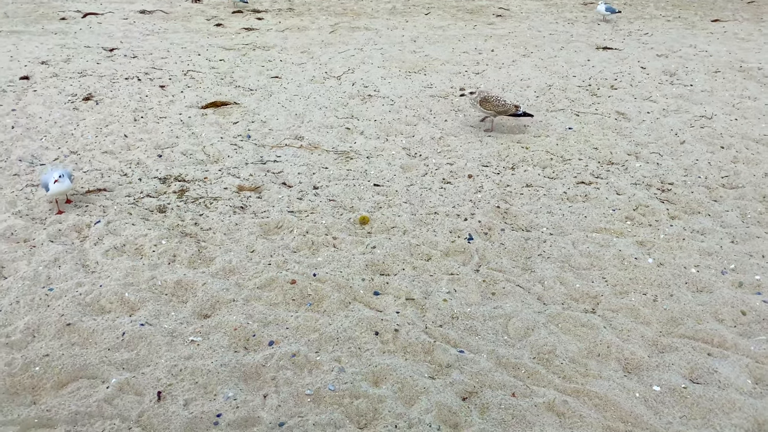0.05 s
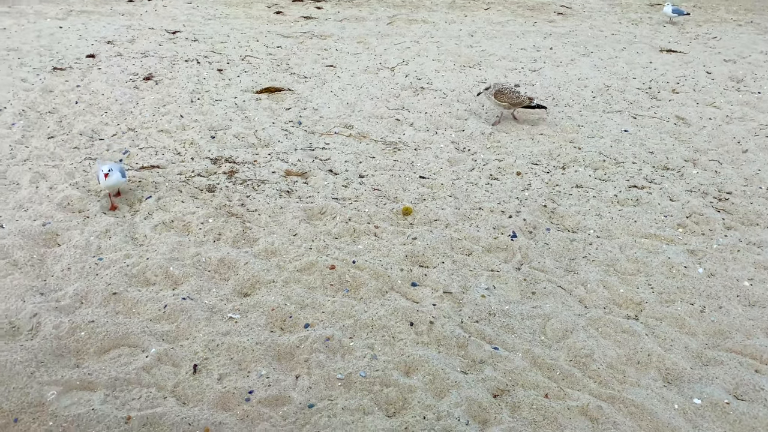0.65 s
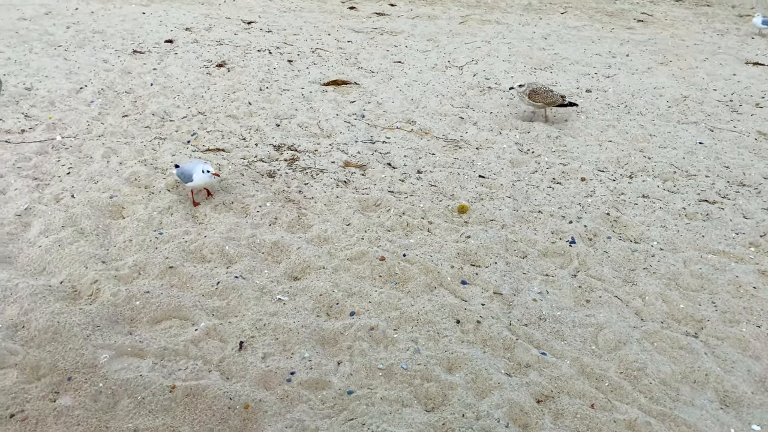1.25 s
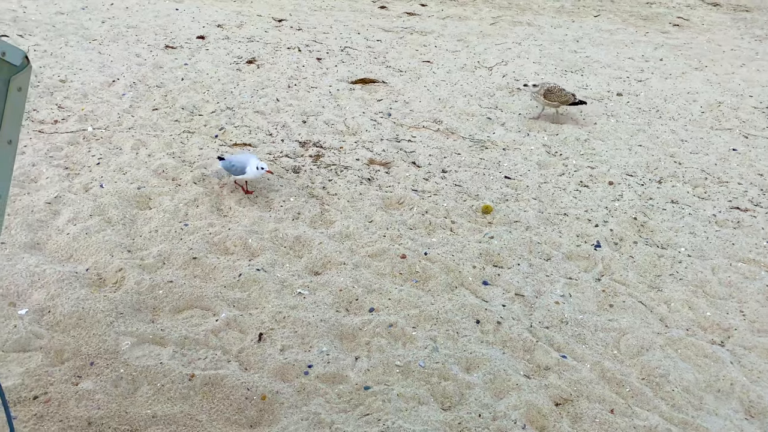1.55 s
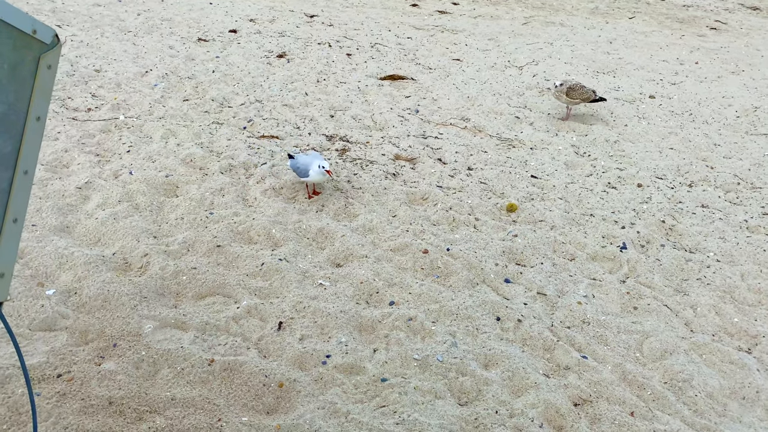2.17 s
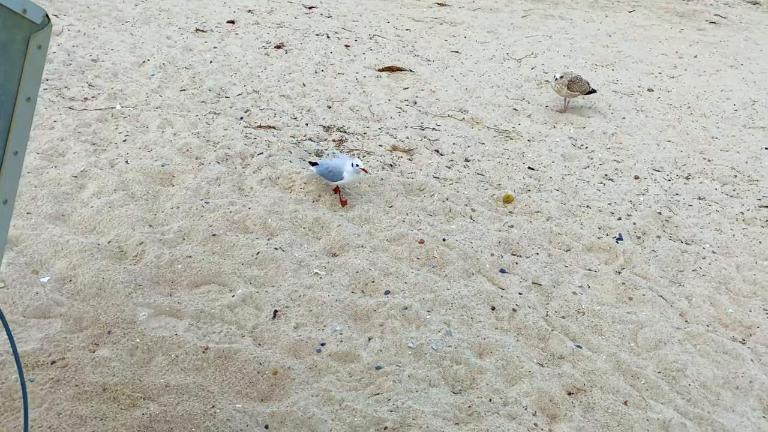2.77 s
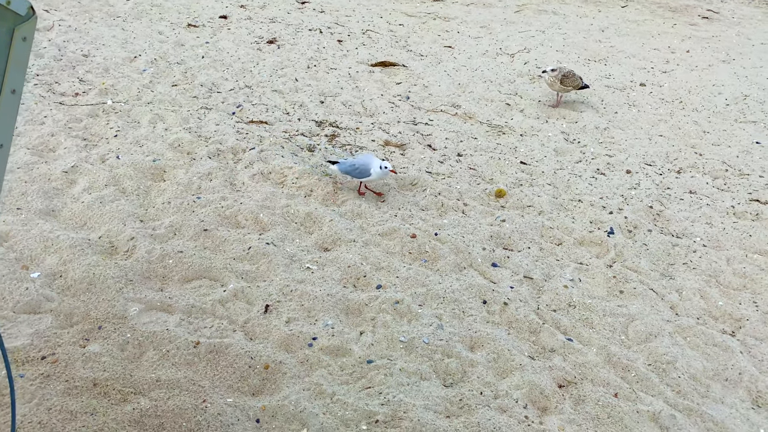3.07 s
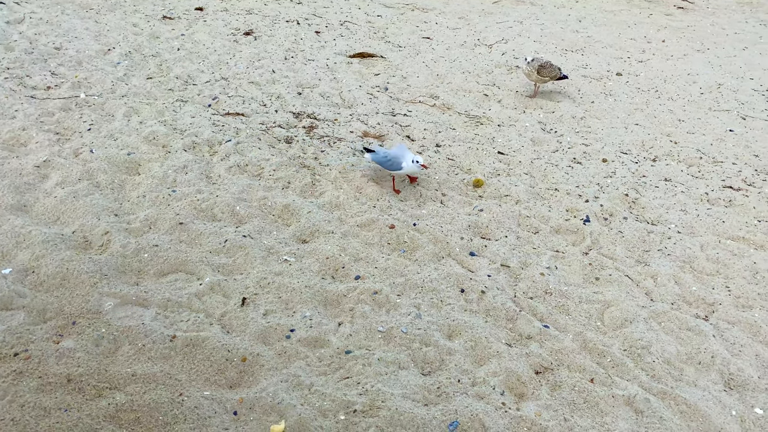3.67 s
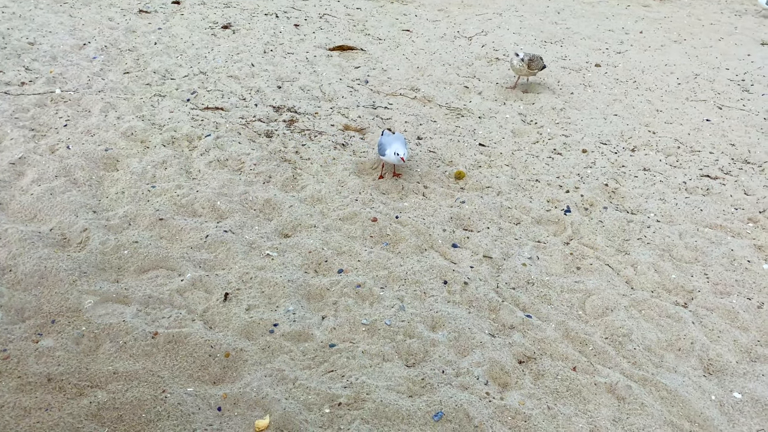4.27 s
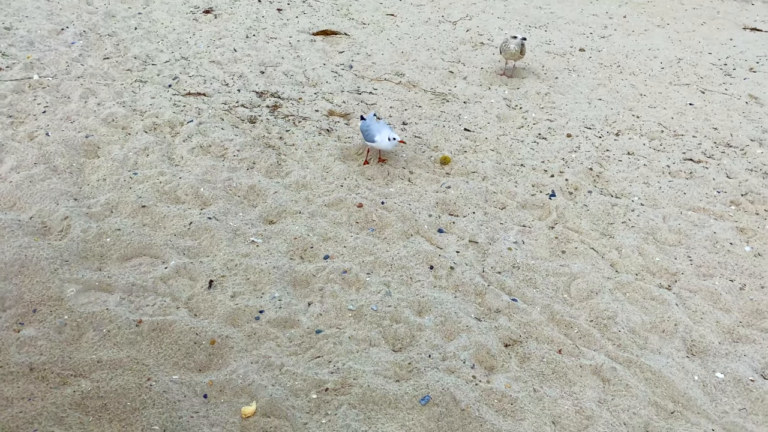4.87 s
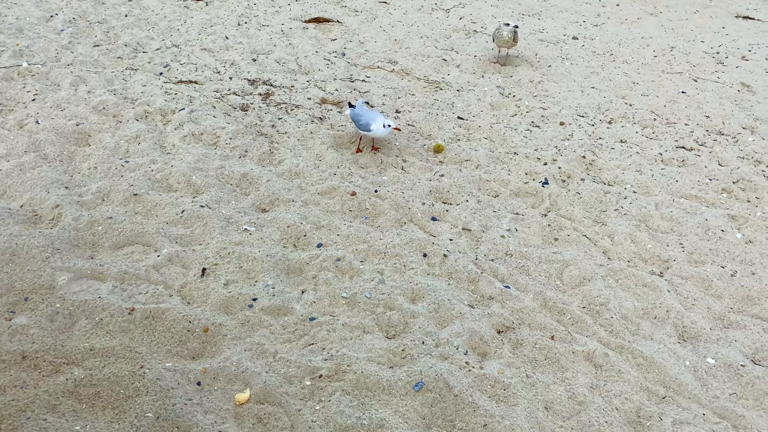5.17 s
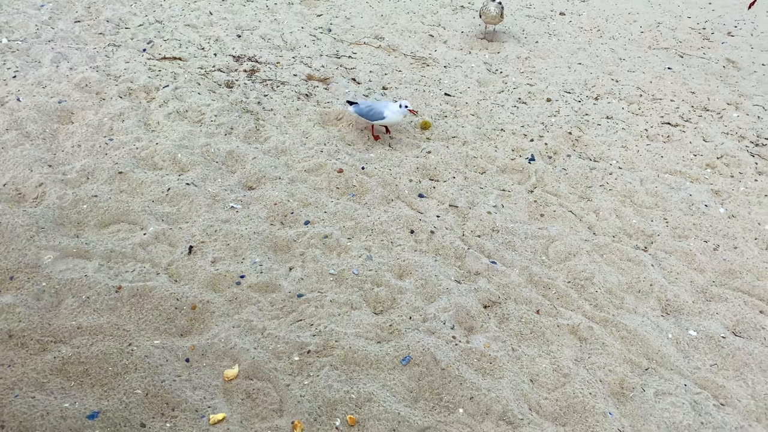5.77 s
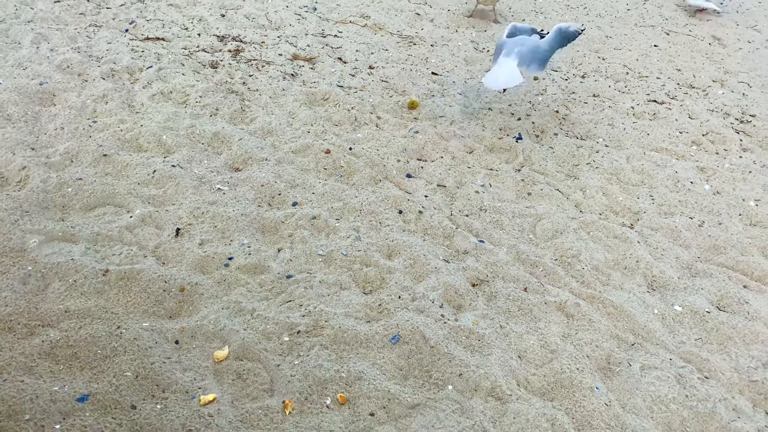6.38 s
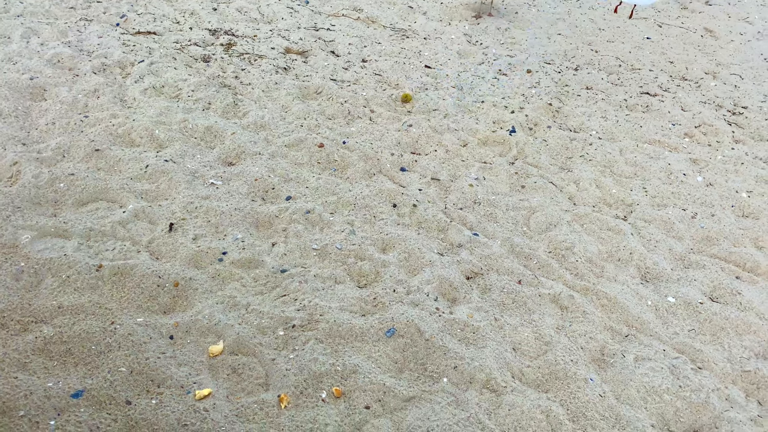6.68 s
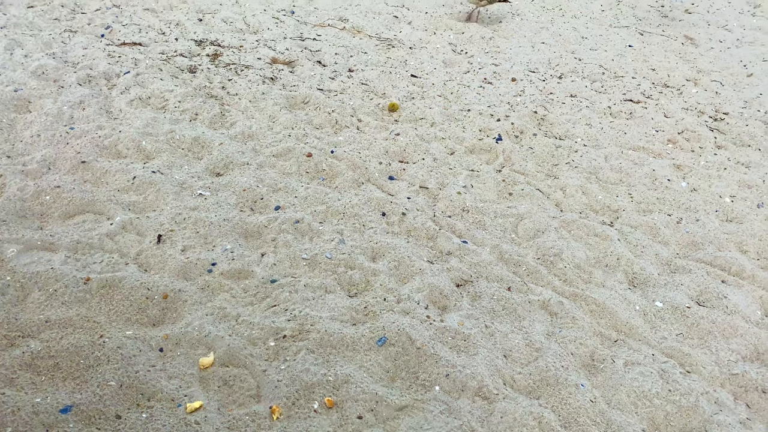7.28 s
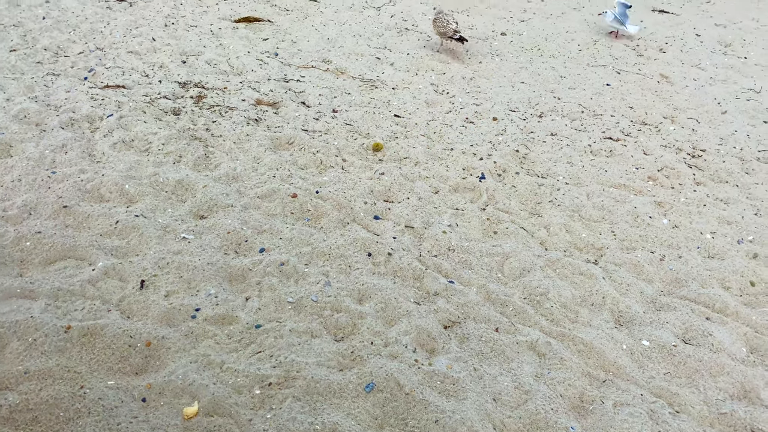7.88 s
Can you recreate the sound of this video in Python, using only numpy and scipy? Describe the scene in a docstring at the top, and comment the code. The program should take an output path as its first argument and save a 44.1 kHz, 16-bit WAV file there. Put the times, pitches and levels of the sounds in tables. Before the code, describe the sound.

On an open beach, gulls give six harsh, reedy calls a few metres from a hand-held microphone, five from the left and the last from the right. A young gull adds three thin, high begging whistles from the left, each overlapping a call. Wind rumbles and thumps on the microphone, growing stronger in the second half, over a soft wash of distant surf.

```python
"""Gulls on a sandy beach

A few metres from a hand-held phone, adult gulls give six harsh calls: a reedy tone from the
syrinx (a bird's voice box) whose pitch and strength collapse some fifty times a second.
A young gull begs in three thin whistles that jump between registers (pitch ranges).
Wind buffets the two microphone openings over a soft wash of surf."""
import sys
import numpy as np
from scipy import signal
from scipy.fft import rfft, irfft, next_fast_len
from scipy.io import wavfile
from scipy.ndimage import uniform_filter1d, map_coordinates

SR = 44100
rng = np.random.default_rng(int(sys.argv[2]) if len(sys.argv) > 2 else 0)


def log_audio(samples):
    """Write samples as a 16-bit WAV file to the path given in sys.argv[1]."""
    # one column per channel
    frames = np.atleast_2d(samples).T
    # limit to full scale, then quantise
    limited = np.clip(frames, -1, 1)
    pcm = np.round(limited * 32767).astype(np.int16)
    wavfile.write(sys.argv[1], SR, pcm)


N = 354343
TIME = np.arange(N) / SR
TOP_HZ = 15800  # the phone cuts off higher sound

# how six throat shapes colour a gull's voice: (frequency [Hz], gain [dB])
SHRILL = [(450, -13), (800, -5), (1100, -12.5), (1400, -3), (1650, -3), (1830, 6), (2020, -9), (2230, 15),
          (2480, 12.5), (2900, 11), (3200, 1), (3700, -10.5), (4270, -4.5), (4600, -11.5), (4960, -2.5),
          (5400, -12), (5720, -10.5), (6300, -18), (7300, -8), (8400, -26.5), (10200, -14.5), (11300, -17),
          (13300, -29), (15500, -15)]
FULL = [(400, 1), (700, 9), (1180, 15.5), (1450, 12), (1900, -3.5), (2300, -2), (2650, -3), (3000, 1),
        (3400, -16), (3700, -19), (4000, -4.5), (4300, -1.5), (4680, 2), (5250, -17), (5750, -10.5),
        (6100, -11), (6650, 3), (7200, -19.5), (7900, -23.5), (9300, -21), (10400, -14), (12000, -31),
        (13200, -35), (15500, -26)]
CROAK = [(400, -27), (650, 3.5), (930, -6), (1350, 1), (1870, 1), (2400, -10), (2850, -2), (3250, 6),
         (3700, -12.5), (4000, -11), (4650, -3.5), (5200, -8), (5700, -13), (6100, -15), (6550, -14.5),
         (7900, -26), (9800, -18.5), (13200, -28), (15500, -45)]
HOARSE = [(450, 1.5), (850, 9), (1280, 10.5), (1480, 5.5), (1750, -7.5), (2020, 1.5), (2550, -10.5),
          (3100, 4), (3800, -15), (4400, -9), (4920, 3), (5350, -15), (5680, -9), (6300, -13.5),
          (8300, -27), (9700, -20), (11000, -22), (13300, -25), (15500, -16)]
WIDE = [(400, -6), (700, -5.5), (1150, -4), (1400, 3), (1700, 14.5), (2150, 6), (2500, -3), (2950, 9.5),
        (3450, -3.5), (4050, -14), (4750, -4.5), (5350, -24), (5750, -11), (6150, -22), (6580, -4.5),
        (7100, -24), (7800, -29), (9450, -12.5), (10400, -21), (11100, -18), (13000, -38), (15500, -26)]
HOLLOW = [(500, -27), (800, -0.5), (1100, 1), (1600, 2), (2300, 12), (3300, -2.5), (4800, -38), (5900, -32),
          (8500, -43), (13000, -39), (15500, -82)]
# how sound from each side reaches the microphones: (frequency [Hz], left minus right [dB], left lead [rad])
FROM_LEFT = [(665, -2.5, 0.17), (1070, 4, 1.22), (1260, -0.5, 0.21), (1590, 12, 1.49), (3020, -2.5, 1.59),
             (3600, -0.5, 1.56), (3750, -8.5, 0.6), (4380, 11.5, 1.5), (5800, -1, 1.58), (6400, 10.5, 1.7),
             (9100, -5.5, 2.42), (9900, -1, 0.39), (11400, -0.5, 1.06), (15600, 1, 2.8)]
FROM_RIGHT = [(790, -4.5, -2), (1060, -7, 2.1), (1840, 4.5, -3), (2550, 4, -0.9), (3430, 0, -2),
              (12000, 0, -1.2)]


def adult_gulls(gain_db=0.92):
    """Five harsh calls come from the left and a last one from the right."""
    # the calls: (start [s], end [s], fade-in [s], rise [s], upward scoop [share of pitch],
    # top pitch [Hz], late pitch [Hz], bend of the fall [1 = straight], crack after [s],
    # step down at the crack [share], roughness [0-1], early throbs [per s], throb depth [0-1],
    # chest tone [dB], its change [dB], its change time [s], raggedness [dB], beak ring [dB],
    # its change [dB], rasp [dB], its change [dB], beak closing [s], throat, direction)
    calls = [ (0.421, 0.822, 0.016, 0.021, -0.042, 1145, 933, 1.58, 0.46, 0.034, 1.0, 51, 0.31, -44.5, 6.5, 0.35, 1.7, -28.5, -4, -34.5, -6, 0.24, SHRILL, FROM_LEFT),
             (1.693, 2.766, 0.06, 0.048, 0.41, 1197, 717, 1.495, 0.48, 0.089, 0.85, 58.13, 0.51, -24.5, -19, 0.97, 1, -29, -8.5, -31.5, -8.5, 0.17, FULL, FROM_LEFT),
             (3.294, 3.891, 0.038, .12, 0.23, 921, 919, 3.7, 0.54, 0.12, 0.6, 50.18, 0.57, -35, -4.5, 1, 0.51, -38, 2, -53, 1, 0.12, CROAK, FROM_LEFT),
             (4.311, 4.686, 0.015, 0.042, 0.28, 1123, 959, 1.55, 0.28, 0.026, 1.0, 54.34, 0.36, -36.5, -15, 1, 2.8, -33, 2, -38, -6, 0.24, HOARSE, FROM_LEFT),
             (5.207, 5.916, 0.049, .06, .27, 1205, 722, 2.1, .5, 0.035, 0.9, 57.56, 0.53, -25, -16, 1, 1.4, -39, 7.5, -41, -3.5, 0.16, WIDE, FROM_LEFT),
             (6.817, 7.842, 0.028, 0.055, 0.25, 1153, 990, 0.64, 0.745, 0.16, 1.0, 53.53, 0.68, -26.5, -16, 0.58, 4.3, -48.5, -13, -76, 11.5, 0.022, HOLLOW, FROM_RIGHT),
             ]
    out = np.zeros((2, N))
    for start, end, *call, direction in calls:
        t = span(start, end)
        add(out, t, undb(gain_db) * harsh_call(t, *call), direction)
    return out


def harsh_call(t, attack_s, rise_s, scoop, top_hz, late_hz, bend, crack_s, step, harsh, early_rate,
               depth, chest_db, chest_change_db, chest_change_s, ragged_db, ring_db, ring_change_db,
               rasp_db, rasp_change_db, closing_s, throat):
    """A call scoops up, glides down, cracks into a clearer voice and drops; its throbs slow as it tires."""
    crack_length_s, end_drop, end_drop_s, release_s = 0.06, 0.27, .065, 0.028
    late_rate, tiring_s = 46.5, .25  # throbs slow to this many a second just before the crack
    shut_ring_db, shut_rasp_db = -21, -22.5  # what a shut beak takes off
    age, remaining = t - t[0], t[-1] - t
    progress = age / age[-1]
    still_to_rise = 1 - ramp(age, rise_s)
    cracked = ramp(age - crack_s + crack_length_s / 2, crack_length_s)
    fall = top_hz + (late_hz - top_hz) * progress ** bend
    pitch = fall * (1 - step * cracked) * (1 - end_drop * (1 - ramp(remaining, end_drop_s)))
    throb_rate = late_rate + (early_rate - late_rate) * ramp(crack_s - age, tiring_s)
    overshoot = .6 * scoop ** 2 * np.exp(-(2 * (age / rise_s - 1.4)) ** 2)
    rough = harsh * (pitch / top_hz) ** .9 * .75 ** cracked
    scooped_pitch = pitch * (1 - scoop * still_to_rise + overshoot)
    voice = colour(syrinx(scooped_pitch, throb_rate, rough, depth), throat)
    # even out three bands; effort then sets the chest tone, and the open beak lets out ring and rasp
    chest = band(voice, 300, 1500) / running_level(band(voice, 750, 1500))
    ring = band(voice, 1500, 3700) / running_level(band(voice, 1500, 2650))
    rasp = band(voice, 3700, 20000) / running_level(band(voice, 5400, 12000))
    shut = still_to_rise ** 2 + (1 - ramp(remaining, closing_s)) ** 2
    chest *= undb(chest_db + chest_change_db * (1 - np.exp(-age / chest_change_s)))
    ring *= undb(ring_db + ring_change_db * progress + shut_ring_db * shut)
    rasp *= undb(rasp_db + rasp_change_db * progress + shut_rasp_db * shut)
    surges = undb(ragged_db * rough * np.tanh(wander(40, len(t))))  # a strained voice is unsteady
    return surges * ramp(age, attack_s) * ramp(remaining, release_s) * (chest + ring + rasp)


def syrinx(pitch, throb_rate, rough, depth):
    """Colliding membranes make a reedy tone, chopped into throbs that snap open and choke off."""
    rough, count = np.clip(rough, 0, 1), len(pitch)
    throbs = np.cumsum(throb_rate * (1 + (.055 + .19 * rough ** 5) * wander(45, count))) / SR
    stage = throbs % 1  # runs from 0 to 1 in each throb
    # a throb starts a little flat, climbs if rough or arches if clearer, and flicks up as it chokes
    choke = np.exp(-(((stage + .5) % 1 - .5) / (.1 + .05 * rough)) ** 2)
    restart = np.exp(-((stage - .13) / .08) ** 2)
    climb = np.clip(.45 * rough ** 2 - .09, -.02, .2)
    arch = -.5 * np.minimum(rough, 1 - rough) * (stage - .45) ** 2
    sweep = .2 * choke ** 3 - .08 * restart + (climb * (stage - .55) + arch + .015) * (1 - choke)
    # hard-driven membranes shake irregularly, which smears the overtones into a screech
    shake = (.007 + .085 * rough ** 2.9) * wander(1400, count)
    shake += (.005 + .032 * rough ** 3) * wander(110, count)
    hz = pitch * (1 + sweep + shake)
    phase = 2 * np.pi * np.cumsum(hz) / SR
    # each overtone flickers by itself, and no two collisions are equally strong
    overtones = sum(np.sin(k * phase) * (k * hz < TOP_HZ) * undb(1.6 * wander(160, count))
                    for k in range(2, 27))
    overtones = unit(overtones) * (1 + .3 * rough ** 2 * wander(1600, count))
    snap = 1.4 * rough * np.exp(-((stage - .1) / .03) ** 2)
    air = (.06 + .23 * rough ** 2.4 + snap) * rng.standard_normal(count)
    # overtones bite hardest just before mid-throb and die first when it chokes
    bite_db = 4.5 * rough * depth * np.cos(2 * np.pi * (stage - .45))
    bite = undb(bite_db + 1.6 * rough * wander(170, count))
    opening = 1 - np.clip(depth, 0, .9) * choke
    base_tone = .45 * np.sin(phase) * undb(1.8 * rough ** 2 * wander(70, count))
    return base_tone * opening + (overtones * opening + air) * bite * np.sqrt(opening)


def young_gull(scoop=0.011):
    """Begging whistles from the left; a note that overlaps the last one slides in from between the two."""
    # one note for each register: (start [s], end [s], pitch [Hz], sag [share of pitch], level [dB],
    # level change [dB], air against the tone [dB], octave overtone before the throat [dB])
    notes = [ (0.395, 0.435, 2760, 0, -44, 10, -4, -18), (1.395, 1.422, 2320, -0.47, -63, 0, -25, 6),
             (1.416, 1.447, 3400, -0.074, -48.5, -7, -6, -4),
             (1.446, 1.472, 2580, -0.24, -49.5, 14, -12, -10),
             (1.46, 1.54, 2875, -0.023, -18.5, -19.5, -39, -36),
             (1.524, 1.554, 3430, -0.038, -28.5, 0, -24, -4),
             (1.544, 1.567, 4050, -0.011, -25, -3, -21, -38),
             (1.557, 1.815, 4440, 0.037, -28.5, -2, -11, -17),
             (1.803, 2.027, 3948, 0.071, -27.5, -1, -14, -40),
             (2.023, 2.06, 3230, -0.079, -30.5, -9, -18, -16), (2.075, 2.092, 2550, 0.1, -30, -2, -17, -20),
             (4.598, 4.631, 2880, -0.0057, -20.5, -12.5, -15, -9.5),
             (4.628, 4.672, 2880, -0.0025, -35.5, 3, -18, -13.5),
             (4.666, 4.696, 3460, -0.024, -24.5, -10.5, -12, -3),
             (4.686, 4.837, 4500, 0.031, -26, 0, -16, -21), (4.826, 5.089, 3990, 0.025, -33, -4, -9, -37.5),
             (5.067, 5.152, 3320, 0.035, -34.5, -2, -8.5, -19.5),
             (5.134, 5.167, 2636, 0.11, -36, -1, -20, -8), (7.23, 7.243, 3820, -0.235, -52.5, 11, -20, -16),
             (7.24, 7.268, 3280, 0.14, -43, 12, -28, -30), (7.263, 7.3, 2980, 0.02, -24, -5, -18, -19),
             (7.294, 7.322, 3720, 0.069, -36.5, -4, -24, -17),
             (7.316, 7.356, 3510, 0.021, -28.5, -1, -17, -16),
             (7.35, 7.418, 4890, -0.0038, -37.5, -6, -7, -23),
             (7.402, 7.543, 5010, 0.0046, -31, -12.5, -19, -21.5),
             (7.528, 7.622, 4845, 0.012, -27, -11.5, -23, -28),
             (7.622, 7.661, 4100, 0.046, -33, -2.5, -15, -51),
             (7.663, 7.695, 2910, 0.11, -40.5, 0, -8, -21), ]
    out = np.zeros((2, N))
    last_end, last_hz = 0, 0
    for start, end, hz, sag, *levels in notes:
        t = span(start, end)
        from_hz = np.sqrt(last_hz * hz) if start < last_end else hz * (1 - scoop)
        add(out, t, whistle(t, from_hz, hz, sag, *levels), FROM_LEFT)
        last_end, last_hz = end, hz * (1 - sag)
    return out


def whistle(t, from_hz, pitch_hz, sag, level_db, change_db, air_db, second_db, third_db=-29):
    """One thin note slides to its pitch, then sags or lifts, over air rushing through the throat."""
    # how the young throat passes overtones: (frequency [Hz], gain [dB])
    squeak = [(5000, -8), (5900, 4), (7000, -9.5), (8000, 21), (9000, -13), (10200, 2.5), (11800, 4),
              (13000, -5), (15500, -10)]
    # the rushing air: (frequency [Hz], level [dB])
    rush = [(850, -50), (1150, 3), (1400, 3.5), (1560, -8), (1780, 6.5), (2080, -7), (2500, 7.5), (2780, 7),
            (3080, -2), (3400, 11), (3650, -6), (3950, 4), (4500, -1), (4900, -1), (5400, -16), (5750, -4),
            (6100, -7), (6500, -12), (7600, -8), (8800, -6), (10200, -18.5), (11600, -4.5), (13200, -25),
            (15500, -20)]
    slide_s, settle_s, edge_s = 0.00356, 0.0033, 0.008
    age, count = t - t[0], len(t)
    progress = age / age[-1]
    to_edge = np.minimum(age, t[-1] - t)
    unsettled = np.exp(-to_edge / settle_s)
    slide = (from_hz / pitch_hz - 1) * np.exp(-age / slide_s)
    waver = .002 * wander(60, count) + (.0055 + .008 * unsettled) * wander(700, count)
    phase = 2 * np.pi * np.cumsum(pitch_hz * (1 - sag * progress ** 2 + slide + waver)) / SR
    second = undb(second_db) * np.sin(2 * phase + .3 * wander(600, count))
    third = undb(third_db) * np.sin(3 * phase + .4 * wander(600, count))
    tone = np.sin(phase) + colour((second + third) * undb(3 * wander(60, count)), squeak)
    flutter = undb(1.2 * wander(35, count) + 1.4 * wander(400, count))
    air = unit(colour(rng.standard_normal(count), rush)) * undb(air_db + 2 * wander(124, count))
    fades = np.sin(np.pi / 2 * ramp(to_edge, edge_s)) ** 2
    return (np.sqrt(2) * tone * flutter + air) * undb(level_db + change_db * progress) * fades


def side_tones(pitch_shake=.016, flutter_db=3.5, edge_s=0.014):
    """The other half of the young gull's syrinx sounds weak, shaky tones of its own."""
    # rough tones beside the whistles: (start [s], end [s], pitch [Hz], level [dB])
    tones = [ (1.515, 1.534, 4480, -38), (1.563, 1.8, 3900, -40.5), (1.571, 1.72, 2730, -54),
             (4.684, 5.07, 3310, -55), (4.842, 5.07, 4400, -48), (4.717, 5.115, 2550, -55),
             (7.318, 7.364, 5200, -51), (7.4, 7.473, 5400, -50), (7.406, 7.47, 5770, -50),
             (7.47, 7.667, 3500, -48), (7.566, 7.62, 4200, -52), ]
    out = np.zeros((2, N))
    for start, end, hz, db in tones:
        t = span(start, end)
        phase = 2 * np.pi * np.cumsum(hz * (1 + pitch_shake * wander(900, len(t)))) / SR
        tone = unit(np.sin(phase) * undb(flutter_db * wander(130, len(t))))
        fades = ramp(np.minimum(t - t[0], t[-1] - t), edge_s)
        add(out, t, tone * undb(db) * fades, FROM_LEFT)
    return out


def beach_echo(birds, tail_db=-27, decay_s=0.48, reflection_db=-17):
    """Things nearby throw back one early reflection to each microphone, then a faint, dull tail."""
    age = np.arange(SR // 2) / SR
    echo = band(rng.standard_normal((2, len(age))), 400, 2940) * undb(-60 * age / decay_s)
    echo = undb(tail_db) * echo / np.sqrt(np.sum(echo ** 2) / 2)
    for channel, lag_s in enumerate((.0073, .0109)):
        echo[channel, int(lag_s * SR)] += undb(reflection_db)
    return signal.fftconvolve(birds.mean(axis=0)[None], echo, axes=1)[:, :N]


def wind(gain_db=2.34, lull_db=3, lulls_per_s=11, flicker_db=3.5, brighten=0.51):
    """Gusts swell out of the breeze and rumble on the microphones; stronger ones sound brighter."""
    # the breeze between gusts: (time [s], relative level [dB])
    breeze = [(0, -46), (.2, -53), (1.1, -53), (1.6, -64), (1.85, -47), (2.7, -40), (3.05, -49), (3.7, -37),
              (4.3, -48), (5.15, -43), (5.5, -39), (6.6, -36), (6.95, -49), (7.35, -48), (8.03, -36)]
    # the gusts: (peak time [s], width [s], relative level [dB])
    gusts = [(.33, 0.026, -47), (.48, 0.038, -41), (.58, 0.043, -38), (.92, 0.099, -43.5),
             (1.29, 0.057, -48), (1.99, 0.082, -33.5), (2.17, 0.037, -35.5), (2.35, 0.044, -33.5),
             (2.65, 0.043, -35), (2.87, 0.097, -30.5), (3.49, 0.03, -32), (3.66, 0.1, -33),
             (3.99, 0.18, -37), (4.628, 0.13, -28), (4.85, 0.032, -44), (5.301, 0.12, -22.5),
             (5.43, 0.033, -21.5), (5.8, 0.16, -28.5), (6.06, 0.17, -27.5), (6.3, 0.16, -28.5),
             (6.578, 0.12, -26), (6.7, 0.097, -36), (6.86, 0.046, -40.5), (7.58, 0.063, -30),
             (7.7, 0.019, -31), (7.898, 0.041, -32)]
    # the wind's rumble: (frequency [Hz], level [dB])
    rumble = [(20, -32), (40, -2), (65, 6.5), (110, 2), (200, -4.5), (350, -8), (600, -20.5), (1000, -28),
              (2000, -47), (4000, -103)]
    roundness = 1.9  # 2 = a rounded gust, 1 = a pointed one
    breeze_db, = curves(breeze, TIME)
    power = undb(breeze_db + lull_db * wander(lulls_per_s, N)) ** 2
    for peak_s, width, db in gusts:
        power += undb(db) ** 2 * .5 ** np.minimum(np.abs(2 * (TIME - peak_s) / width) ** roundness, 20)
    noise = colour(turbulence(N), rumble)
    noise /= np.sqrt(np.mean(running_level(noise, 0.024) ** 2, axis=0))
    upper = band(noise, 295, 8000)
    gust_db = 10 * np.log10(power) + flicker_db * wander(45, N)
    upper_gain = undb(brighten * np.minimum(gust_db + 25.0, 6))
    return undb(gust_db + gain_db) * (noise - upper + upper * upper_gain)


def eddies(gain_db=-2, rise_s=0.0091):
    """Single swirls of air briefly thump the microphones; hard ones crackle higher."""
    # the swirls: (time [s], relative peak level [dB], extra brightness [dB per octave])
    swirls = [(1.671, -25.5, -19), (1.869, -21, -11), (2, -18, -7), (2.169, -23.5, 4), (2.333, -21, -22),
              (2.387, -18, -13), (2.801, -22.5, -2), (2.853, -15.5, -4.5), (3.625, -17.5, -2),
              (3.696, -31.5, 12), (3.924, -18, -6.5), (4.576, -12.5, -5), (4.62, -13, -1.5),
              (5.295, -11, 5.5), (5.339, -24, 18), (5.379, -17, 3), (5.431, -20.5, 7.5), (5.576, -21, -1),
              (5.777, -14, -2.5), (5.912, -8, 4), (6.002, -16.5, -2.5), (6.094, -19.5, -0.5),
              (6.267, -19.5, 4.5), (6.296, -16, -6), (6.331, -12, 3.5), (6.389, -16.5, -13),
              (6.483, -17, 13), (6.534, -12, 3), (7.606, -14.5, -14), (7.886, -15.5, -21)]
    # the tone of one thump: (frequency [Hz], level [dB])
    thump_colour = [(25, -56), (70, -10), (140, 1), (280, -0.5), (500, -12.5), (900, -26), (1800, -57.5),
                    (4000, -104)]
    out, count = np.zeros((2, N + SR)), SR // 10
    rises = np.arange(count) / SR / rise_s
    shape = (rises * np.exp(1 - rises)) ** 2
    for start_s, db, brightness in swirls:
        slope = brightness + .25 * (db + 20)
        noise = colour(turbulence(count), thump_colour)
        thump = shape * filtered(noise, lambda f: undb(slope * np.log2(np.clip(f, 100, 2000) / 200)))
        start = int(start_s * SR)
        out[:, start:start + count] += thump / running_level(thump, 0.0035).max() * undb(db + gain_db)
    return out[:, :N]


def turbulence(count, unshared=0.89, lead_rad=-1.31, left_db=4):
    """Both microphones feel partly the same swirls, out of step; the left one crackles more."""
    shared = rng.standard_normal(count)
    sides = []
    for sign in (1, -1):
        pressure = filtered(shared, lambda f: np.exp(.5j * sign * lead_rad))
        pressure += unshared * rng.standard_normal(count)
        sides.append(filtered(pressure, lambda f: undb(sign * left_db / 2 * np.minimum(f / 600, 1))))
    return np.array(sides)


def surf():
    """Small waves wash in the distance, with a fine hiss."""
    # the rise and fall of the waves: (time [s], wash level [dB], hiss level [dB])
    waves = [(0, -53, -86), (.5, -53, -86), (.95, -51.5, -85), (1.3, -57.5, -85), (1.55, -59, -82),
             (2.2, -54, -72), (2.75, -52.5, -69), (3.1, -49.5, -67), (3.6, -52.5, -67), (4.15, -54.5, -68),
             (5.1, -55, -69), (6.2, -55.5, -66), (6.75, -54.5, -67), (8.03, -53, -67)]
    # the tone of the wash: (frequency [Hz], level [dB])
    wash_colour = [(60, -61), (250, -6), (500, -2.5), (900, -2), (1400, -2), (2200, -11), (3300, -11),
                   (5000, -21), (6500, -19), (8500, -32.5), (11000, -34), (15500, -72)]
    wash_db, hiss_db = curves(waves, TIME)
    wash = colour(rng.standard_normal((2, N)) + 0.82 * rng.standard_normal(N), wash_colour)
    hiss = band(rng.standard_normal((2, N)), 3500, 16000)
    lapping_db = .5 * wander(14, N)
    return unit(wash) * undb(wash_db + lapping_db) + unit(hiss) * undb(hiss_db + lapping_db)


def add(out, t, x, direction):
    """Mix a sound in at times t, with the left-right level and phase differences of its direction."""
    start = int(round(t[0] * SR))
    for channel, sign in enumerate((1, -1)):
        def response(f):
            balance_db, lead = at_hz(direction, f)
            return np.sqrt(2 / (1 + undb(-2 * sign * balance_db))) * np.exp(.5j * sign * lead)
        out[channel, start:start + len(t)] += filtered(x, response)


def undb(db):
    """Turn decibels into a gain."""
    return 10 ** (np.asarray(db) / 20)


def curves(rows, t):
    """The columns of a table, joined by straight lines, at times t."""
    times, *columns = np.transpose(rows)
    return [np.interp(t, np.sort(times), c) for c in columns]


def at_hz(rows, f):
    """The columns of a table at frequencies f, on a scale of evenly spaced octaves."""
    points, *columns = np.transpose(rows)
    return [np.interp(np.log(f + 1), np.log(points), c) for c in columns]


def filtered(x, response):
    """Filter by a gain given as a function of frequency."""
    size = next_fast_len(x.shape[-1] + 2048)
    return irfft(rfft(x, size) * response(np.fft.rfftfreq(size, 1 / SR)), size)[..., :x.shape[-1]]


def colour(x, rows):
    """Filter by a table of (frequency [Hz], gain [dB])."""
    return filtered(x, lambda f: undb(at_hz(rows, f)[0]))


def band(x, lo, hi):
    """Keep what lies between lo and hi Hz."""
    return filtered(x, lambda f: 1 / (1 + (f / hi) ** 20) - 1 / (1 + (f / lo) ** 20))


def unit(x):
    """Scale to an average (rms) level of 1."""
    return x / np.sqrt(np.mean(x ** 2))


def wander(rate, count):
    """A smooth random curve of spread near 1 that changes about rate times a second."""
    knots = rng.standard_normal(int(count * rate / SR) + 4)
    return map_coordinates(knots, [1 + np.arange(count) * rate / SR], order=3, mode="nearest")


def running_level(x, seconds=.03):
    """The average (rms) level around each moment."""
    size = int(seconds * SR)
    return np.sqrt(np.abs(uniform_filter1d(uniform_filter1d(x ** 2, size), size)) + 1e-14)


def span(start, end):
    """The sample times of an event."""
    return TIME[(TIME >= start) & (TIME <= end)]


def ramp(seconds, length):
    """Rise from 0 to 1 over a length of time."""
    return np.clip(seconds / length, 0, 1)


def scene():
    """The gulls and their echo, with wind and surf around them."""
    birds = adult_gulls() + young_gull() + side_tones()
    return birds + beach_echo(birds) + wind() + eddies() + surf()


def record(dry):
    """The phone steeply cuts the highest treble."""
    return signal.sosfilt(signal.ellip(10, .2, 80, TOP_HZ, fs=SR, output="sos"), dry)


dry = scene()
out = record(dry)
log_audio(out)
```